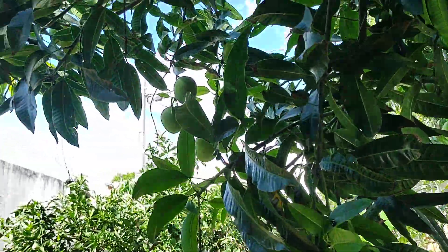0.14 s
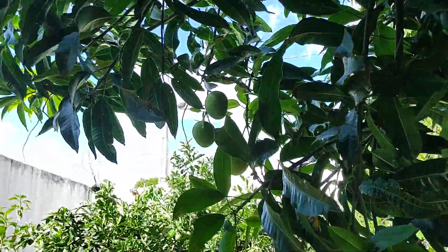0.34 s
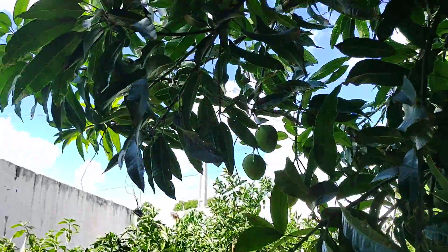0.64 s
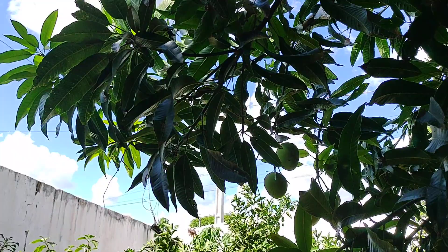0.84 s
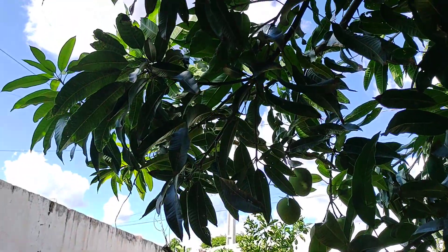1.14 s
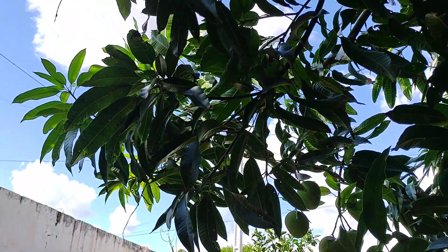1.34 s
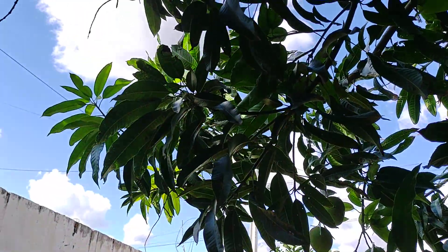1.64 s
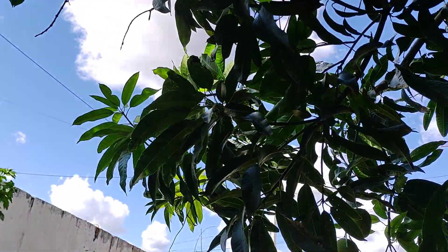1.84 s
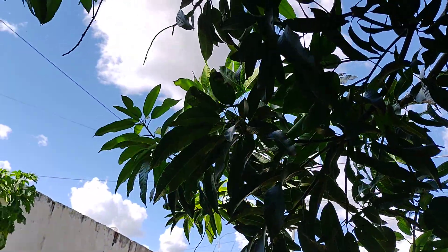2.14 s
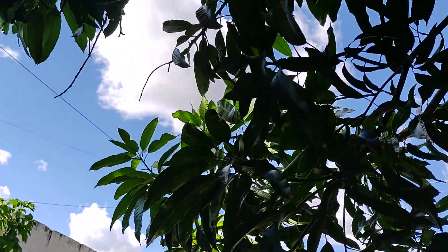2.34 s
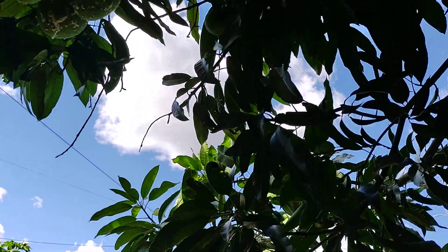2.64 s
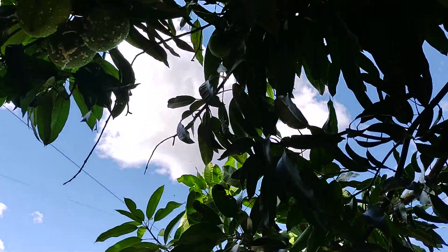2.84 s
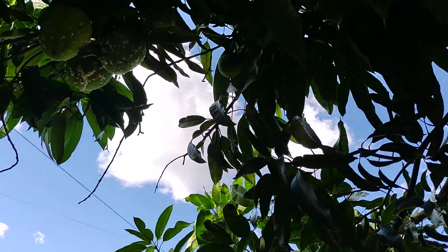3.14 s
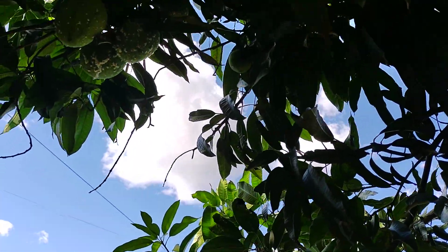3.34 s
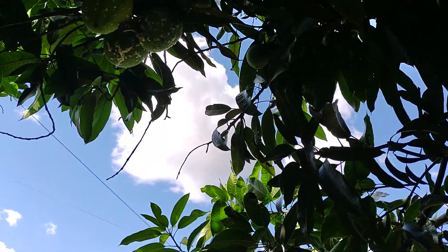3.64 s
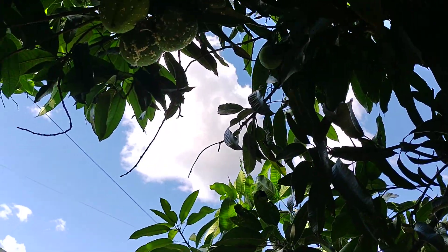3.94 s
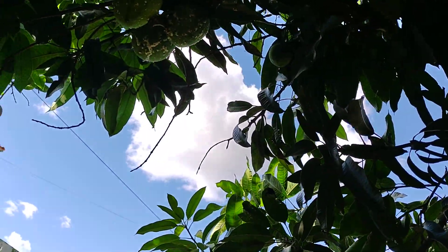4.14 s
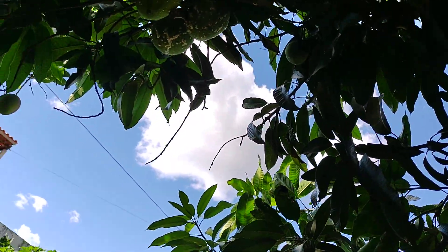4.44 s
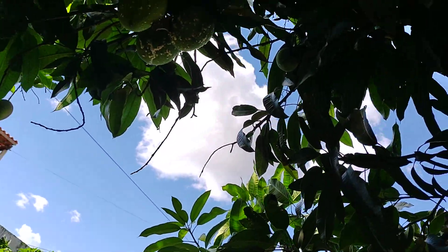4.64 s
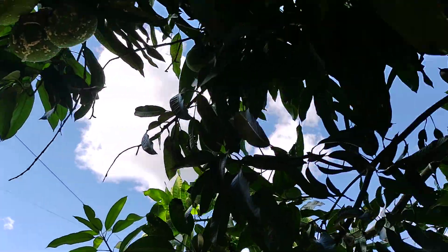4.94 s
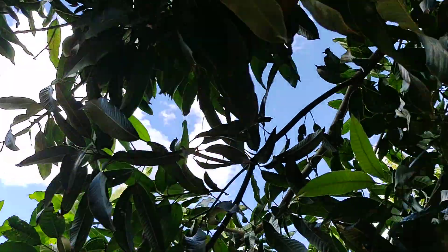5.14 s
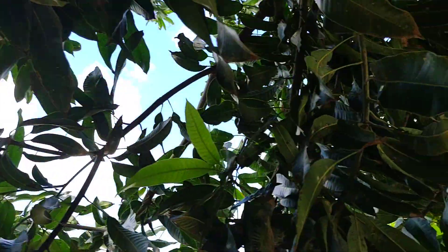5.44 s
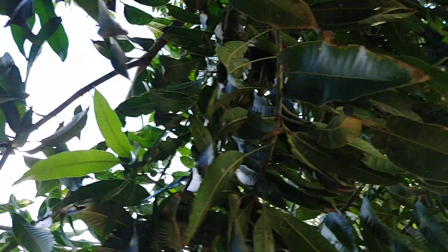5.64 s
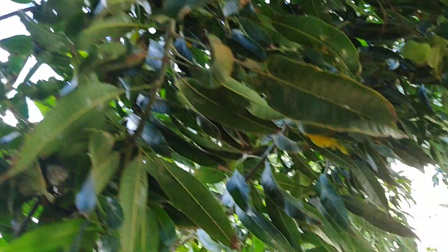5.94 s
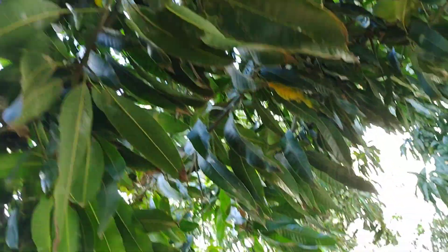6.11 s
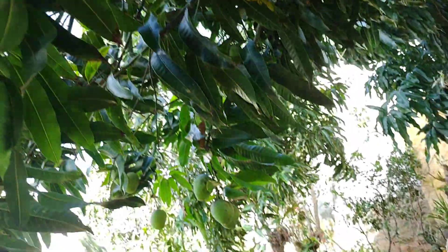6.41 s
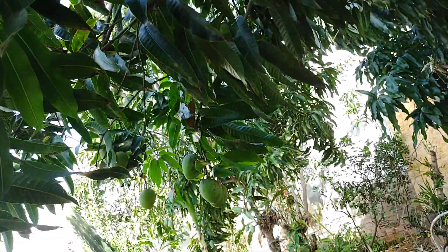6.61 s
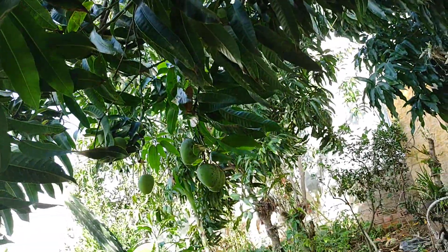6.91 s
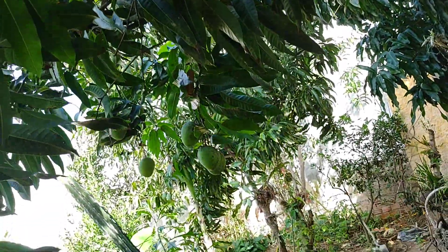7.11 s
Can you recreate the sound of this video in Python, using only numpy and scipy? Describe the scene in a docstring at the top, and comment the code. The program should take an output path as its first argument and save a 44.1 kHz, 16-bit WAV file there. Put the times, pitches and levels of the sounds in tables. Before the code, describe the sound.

Leaves hiss and flap in swelling, fading wind while a twig cracks close by and a distant bird pips over a low rumble.

```python
"""Gusts in a mango tree

Wind stirs stiff leaves in a walled garden, heard in mono from under the branches.
Each swinging branch brings a swell of tiny leaf contacts that hiss, rub and flap.
Some leaves slap together, branches bump, and one twig snaps close by.
Farther off, a small bird whistles and two faint hoots sound over a low outdoor rumble."""
import sys
import numpy as np
from scipy import signal
from scipy.fft import rfft, irfft, next_fast_len
from scipy.io import wavfile
from scipy.ndimage import uniform_filter1d, map_coordinates

SR = 44100
rng = np.random.default_rng(int(sys.argv[2]) if len(sys.argv) > 2 else 0)


def file_out(sig):
    """Save sig as 16-bit WAV at sys.argv[1]."""
    # one column per channel
    cols = np.atleast_2d(sig).T
    # limit, then scale
    lim = np.clip(cols, -1, 1)
    pcm = np.round(lim * 32767).astype(np.int16)
    wavfile.write(sys.argv[1], SR, pcm)


N = 320607
TIME = np.arange(N) / SR

# One branch swinging in the wind per row: peak_s, hiss_db, rise_s, fall_s, rub_db, flap_db
# Rise and fall are the time for a 10 dB change; rub and flap are relative to the hiss.
SWELLS = [(0.036, -44.5, 0.3, 0.108, 1, -15), (0.277, -34.5, 0.2, 0.26, -1, -5),
          (0.547, -33, 0.14, 0.0666, -3, -12.5), (0.616, -35, 0.03, 0.083, 1.5, -6),
          (0.921, -34.0, 0.02, 0.052, -1.5, -18), (1.169, -30.0, 0.21, 0.079, -2.5, -16),
          (1.463, -57, 0.1, 0.1, -13, -8), (1.89, -60.0, 0.1, 0.4, -11.5, -20),
          (2.231, -44.5, 0.186, 0.1, -0.5, -15), (2.415, -42.0, 0.126, 0.03, -10, -12.5),
          (2.517, -38.0, 0.073, 0.02, -1, -13), (2.609, -38.5, 0.03, 0.223, 0.5, -14.5),
          (2.743, -38.0, 0.0224, 0.097, 3, -11), (2.845, -32.0, 0.037, 0.11, 1, -12.5),
          (3.061, -35.0, 0.0674, 0.069, 2, -16), (3.228, -41.0, 0.13, 0.08, 0, -12),
          (3.48, -42.5, 0.06, 0.06, -4, -17), (3.655, -36.5, 0.09, 0.37, 2, -9),
          (3.86, -31.0, 0.139, 0.1848, -4, -10.5), (4.21, -29, 0.0427, 0.07, -7.5, -17),
          (4.423, -34.0, 0.31, 0.174, -1.5, -11), (4.576, -37.5, 0.146, 0.18, -3, -6),
          (4.841, -27.5, 0.087, 0.097, -3, -6.5), (5.121, -38.5, 0.17, 0.121, -3, -9),
          (5.28, -41.0, 0.33, 0.16, 0, -28), (5.513, -48.0, 0.1, 0.11, -2.5, -29),
          (5.82, -41.0, 0.1, 0.186, -13, -28), (6.069, -42.5, 0.06, 0.38, -0.5, -28),
          (6.418, -27.0, 0.0865, 0.09, 0.5, -10.5), (6.6, -45.0, 0.1, 0.114, 0, -4.5),
          (6.792, -38, 0.31, 0.11, -5.5, -18), (7.074, -42.5, 0.02, 0.2, -4, -13),
          (7.191, -42.5, 0.056, 0.05, -2.5, -23)]
# Leaves and stalks slapping together: start_s, level_db, stalk_pitch_hz, relative_scrape_db
SLAPS = [(0.036, -21, 960, -11.5), (0.49, -12.5, 4230, -8.5), (0.503, -7, 3260, -10.5),
         (0.555, -9.5, 3730, -22), (0.601, -9.5, 3710, -7), (0.719, -19.5, 4320, -13),
         (0.812, -17, 3700, -10.5), (1.915, -38, 3500, 0.5), (2.117, -29, 3890, -7.5),
         (2.482, -24, 3320, -15), (2.837, -10.5, 4250, -16), (3.122, -19, 1170, -13),
         (3.137, -15.5, 1300, -17), (3.369, -24, 3080, -12), (4.182, -12.5, 4440, -15.5),
         (4.358, -15, 2950, -21), (4.799, -17, 1440, -12), (5.233, -14, 4900, -17),
         (5.284, -28.5, 3660, 3.5), (5.38, -28, 1610, 1), (6.404, -9, 4260, -12), (6.706, -24.5, 2650, -1),
         (6.729, -9, 3800, -12), (6.754, -20.5, 2390, -7), (6.804, -15, 3640, -9.5)]
# The tones of the breaking twig: pitch_hz, level_db, fade_s (time to drop 60 dB)
TWIG_TONES = [(1000, -24, 0.0054), (1720, -18.5, 0.016), (2530, -17.5, 0.019), (4370, -14, .012),
              (6420, -5, 0.015), (6950, 0.5, 0.0054)]
# Branches swinging against each other: peak_s, level_db, length_s
BUMPS = [(0.47, -48, 0.19), (1.964, -42, 0.0039), (3.8, -47, 0.17), (4.795, -33.5, 0.018),
         (6.412, -40, 0.037)]
# The bird's clear, repeated pip: start_s, pitch_hz, level_db
PIPS = [(.723, 4300, -42.5), (1.253, 4220, -38), (2.305, 4330, -41.5), (3.451, 4290, -39),
        (4.068, 4250, -37.5), (4.654, 4250, -40), (5.18, 4280, -39), (5.8, 4305, -39.5),
        (7.048, 4315, -37.5)]
# Its rising chirps: start_s, length_s, start_pitch_hz, level_db, rasp (0 is pure, 1 is rough)
CHIRPS = [(1.342, 0.077, 4180, -50, .6), (1.395, .067, 4900, -51, .7), (1.694, 0.059, 4060, -41, .22),
          (1.702, .11, 4850, -47.5, .35), (1.91, .03, 5260, -47, .3), (1.756, .15, 4000, -46.5, .65),
          (5.635, .06, 4700, -46, 0.04), (5.688, .085, 5060, -36.5, .27), (6.172, .05, 4650, -40.5, .2),
          (6.25, .072, 5080, -35.5, .18), (6.28, .08, 2620, -44, 0.45), (6.84, .088, 5020, -40, .45),
          (7.246, .04, 4700, -37, .1)]
# Faint, distant hoots: peak_s, length_s, pitch_hz, level_db
HOOTS = [(2.385, .04, 802, -54), (2.495, .05, 784, -50)]
# How the background rises and falls: time_s, level_db
RUMBLE_LEVELS = [(0, -55), (1.45, -56.5), (2.1, -62), (2.55, -57.5), (3.3, -54), (4.05, -60), (4.5, -65),
                 (4.95, -64.5), (5.4, -59.5), (6.45, -55), (7.27, -55.5)]
BUFFET_LEVELS = [(0, -50), (.3, -51.5), (.55, -59.5), (.78, -53), (1.8, -58), (2.8, -57), (3.85, -47),
                 (4.1, -51.5), (4.4, -61), (6.1, -58), (6.45, -49.5), (6.62, -53), (7.27, -49.5)]

# The colour of each noise, or how strong it is from bass to treble: frequency_hz, level_db
HISS_COLOUR = [(800, -43.5), (2000, -16.5), (3200, -2.5), (4300, 0.5), (6000, -0.5), (7300, -0.5),
               (8500, -9)]  # leaf edges
RUB_COLOUR = [(600, -37.5), (1100, -11.5), (1700, -3), (2500, 1.5), (3200, -1.5), (4400, -3.5),
              (7500, -27.5)]  # leaves rubbing
BLADE_COLOUR = [(350, -32), (640, -12), (800, -4.5), (1250, -3.5), (1700, -5), (2600, -13), (5000, -49)]  # the broad, flat part of a leaf
FLAP_COLOUR = [(100, -34.5), (220, -6), (340, 0), (600, 3.5), (820, -1), (1100, -10.5), (2000, -21.5),
               (5000, -43.5)]  # leaves flapping
CRACK_COLOUR = [(150, -22), (600, -24.5), (1500, -1), (3800, 0.5), (6500, 1.5), (8000, -5)]  # slaps and splinters
BUMP_COLOUR = [(70, -20), (180, -10.5), (300, -2), (470, -1), (700, -1), (1500, -26), (4000, -55)]  # branches meeting
RUMBLE_COLOUR = [(12, -31.5), (26, -13.5), (35, 0), (46, -12), (70, -18), (200, -47.5)]  # deep outdoor rumble
BUFFET_COLOUR = [(35, -18), (60, -6.5), (83, 2.5), (120, -3), (165, -9), (220, -19), (500, -36.5),
                 (1500, -67.5)]  # low buffeting of the air
WASH_COLOUR = [(60, -13.5), (160, -3), (290, -2), (600, -8), (950, -10), (1500, -32), (3000, -17.5),
               (8000, -24.5)]  # the neighbourhood

# The garden's echo: frequency_hz, fade_s (time to drop 60 dB)
GARDEN_ECHO = [(200, .25), (2000, 0.39), (5000, 0.46), (8000, 0.26)]
# How the microphone dulls the top treble: frequency_hz, gain_db
MICROPHONE = [(7400, -1), (7750, -2.5), (8050, -13), (8350, -18.5), (8600, -40)]


def foliage():
    """Stronger wind brings more leaf contacts; twigs shake them into quick clumps."""
    hiss_db, rub_db, flap_db = swells()
    rate = 1500 * amp(.6 * (hiss_db - hiss_db.mean()))  # contacts a second
    shake = wobble(70)
    hiss = contacts(HISS_COLOUR, rate, spread_db=4.5, blur_db=4, leaf_db=1.3, echo_db=1.25)
    hiss *= amp(hiss_db + 6 + .6 * shake)
    rub = contacts(RUB_COLOUR, rate, spread_db=3.5, blur_db=-.5, leaf_db=1.5, echo_db=2)
    rub *= amp(rub_db + .5 + .77 * shake)
    # the broad blades sound only when leaves both rub and flap
    blade = contacts(BLADE_COLOUR, rate, spread_db=4.5, blur_db=1, leaf_db=.5, echo_db=2.5)
    blade *= amp(.51 * flap_db + .49 * rub_db + .5 + 1.52 * shake)
    flutter = amp(flap_db - 2 + 1.8 * wobble(35))
    flap = flutter * contacts(FLAP_COLOUR, rate, spread_db=3, blur_db=-2.5, leaf_db=1, echo_db=3.5)
    return hiss + rub + blade + flap


def swells():
    """Each branch swing builds and dies away; together they set the hiss, rub and flap levels in dB."""
    calm_db = -72.5  # the leaves never stand quite still
    turn_s = .005  # rounds off each peak
    power = np.full((3, N), amp(calm_db) ** 2)
    for peak_s, level_db, rise_s, fall_s, rub_db, flap_db in SWELLS:
        near = slice(max(int((peak_s - 5 * rise_s) * SR), 0), int((peak_s + 5 * fall_s) * SR))
        lag_s = TIME[near] - peak_s
        drop_db = 10 * (np.hypot(lag_s, turn_s) - turn_s) / np.where(lag_s < 0, rise_s, fall_s)
        shares = amp([0, rub_db, flap_db])
        power[:, near] += np.outer(shares, amp(level_db - drop_db)) ** 2
    hiss_db, rub_db, flap_db = 10 * np.log10(power)
    part_below_db = -44  # in weaker wind the leaves part, so rub and flap fade faster
    parted_db = .23 * np.minimum(hiss_db - part_below_db, 0)
    return hiss_db, rub_db + parted_db, flap_db + parted_db


def contacts(colour, rate, spread_db, blur_db, leaf_db, echo_db):
    """Leaves touch in tiny ticks of uneven strength, over the blur of distant ones."""
    strength = amp(spread_db * np.minimum(rng.exponential(size=N), 4))
    ticks = (rng.random(N) < rate / SR) * strength * rng.choice([-1, 1], N)
    rustle = normalise(ticks / np.sqrt(rate)) + amp(blur_db) * rng.standard_normal(N)
    rustle = patchy(rustle, leaf_db, size=128)  # each leaf has its own broad colour
    rustle = patchy(rustle, echo_db, size=1024)  # echoes between leaves add narrow peaks and dips
    return normalise(coloured(rustle, colour))


def slaps():
    """Two leaves meet with a sharp tick and a dead knock of the stalk, then scrape apart."""
    leaves, stalks = np.zeros((2, N))
    t = np.arange(SR // 4) / SR
    for start_s, level_db, stalk_hz, scrape_db in SLAPS:
        tick, scrape = rng.standard_normal((2, len(t)))
        tick *= fade(t, level_db - 4.5, fade_s=.011)
        scrape *= fade(t, level_db + scrape_db, fade_s=.093)
        add(leaves, start_s, tick + scrape)
        add(leaves, start_s, amp(level_db - 5.5) * np.ones(2))  # the first touch is a single push
        add(stalks, start_s, fade(t, level_db - 8.5, fade_s=.018) * sine(stalk_hz, t))
    return garden(coloured(leaves, CRACK_COLOUR) + stalks, echo_db=-9)


def twig_snap():
    """The twig breaks with a short ring; fibres splinter and nearby leaves scatter the crack."""
    snap_s, last_fibre_s = 1.9573, 1.9675
    wood, splinters = np.zeros((2, N))
    t = np.arange(SR // 4) / SR
    ring = sum(fade(t, db, fade_s) * sine(hz, t) for hz, db, fade_s in TWIG_TONES)
    attack = 1 - np.exp(-t / .00041)
    add(wood, snap_s, amp(.5) * attack * ring)
    add(wood, last_fibre_s, fade(t, -18, fade_s=.0055) * ring)
    burst = fade(t, -23.5, fade_s=.011) + fade(t, -15.5, fade_s=.14)
    add(splinters, snap_s, burst * rng.standard_normal(len(t)))
    return garden(wood + coloured(splinters, CRACK_COLOUR), echo_db=-14)


def branch_bumps():
    """Branches meet through a cushion of leaves: a soft, dull thud."""
    push = sum(amp(db) * hump(peak_s, length_s) for peak_s, db, length_s in BUMPS)
    return push * noise(BUMP_COLOUR)


def bird():
    """Thin gliding whistles, roughened by a fast uneven trill and blurred by the trees in between."""
    pip_s, pip_fall_hz, pip_rasp = .055, 60, .1
    chirp_rise_hz_per_s, trill_hz = 1500, 85
    pips = [(start_s, pip_s, hz, -pip_fall_hz, db, pip_rasp) for start_s, hz, db in PIPS]
    chirps = [(start_s, length_s, hz, chirp_rise_hz_per_s * length_s, db, rasp)
              for start_s, length_s, hz, db, rasp in CHIRPS]
    song = np.zeros(N)
    for start_s, length_s, start_hz, glide_hz, level_db, rasp in pips + chirps:
        progress = np.linspace(0, 1, int(length_s * SR))
        t = progress * length_s
        waver = map_coordinates(rng.standard_normal(128), [t * 700], mode="wrap")
        pitch_hz = start_hz + glide_hz * progress + rasp * (380 * sine(trill_hz, t) + 400 * waver)
        loudness = amp(level_db - .7) * np.sqrt(np.abs(np.sin(np.pi * progress)))
        add(song, start_s, loudness * np.sin(2 * np.pi * np.cumsum(pitch_hz) / SR))
    return garden(song, echo_db=-2.5)


def hoots():
    """Two soft, far-off hoots, each a pure tone that fades in and out."""
    tones = sum(amp(db) * hump(peak_s, length_s) * sine(hz, TIME) for peak_s, length_s, hz, db in HOOTS)
    return garden(tones, echo_db=-12)


def air():
    """Deep outdoor rumble, soft buffeting and the steady wash of the neighbourhood."""
    rumble = amp(over_time(RUMBLE_LEVELS) + 2.5) * noise(RUMBLE_COLOUR)
    buffet = amp(over_time(BUFFET_LEVELS) + .9) * noise(BUFFET_COLOUR)
    return rumble + buffet + amp(-65) * noise(WASH_COLOUR)


def garden(sound, echo_db):
    """Leaves and walls scatter a sound, adding a short echo."""
    hz, t, bands = signal.stft(rng.standard_normal(SR // 2), SR, nperseg=256)
    fade_s = over_frequency(GARDEN_ECHO, hz)[:, None]
    tail = signal.istft(bands * fade(t, 0, fade_s), SR, nperseg=256)[1]
    return sound + amp(echo_db) * signal.fftconvolve(sound, tail / np.linalg.norm(tail))[:N]


def patchy(sound, depth_db, size):
    """Let the colour drift in patches; a larger size makes them narrower and longer-lived."""
    bands = signal.stft(sound, nperseg=size)[2]
    patches = uniform_filter1d(rng.standard_normal(bands.shape), size=4, axis=0)  # smooth over frequency
    patches = uniform_filter1d(patches, size=8, axis=1)  # and over time
    return signal.istft(bands * amp(depth_db * normalise(patches)), nperseg=size)[1][:N]


def amp(db):
    """Turn decibels into a multiplier."""
    return 10 ** (np.asarray(db) / 20)


def normalise(sound):
    """Scale to an average power of 1."""
    return sound / np.sqrt(np.mean(sound ** 2) + 1e-20)


def sine(hz, t):
    """A pure tone."""
    return np.sin(2 * np.pi * hz * t)


def fade(t, start_db, fade_s):
    """A level that drops 60 dB every fade_s seconds."""
    return amp(start_db - 60 * t / fade_s)


def hump(peak_s, length_s):
    """A smooth rise to 1 and back."""
    return np.exp(-2 * ((TIME - peak_s) / length_s) ** 2)


def wobble(rate):
    """A smooth curve through `rate` random points a second."""
    return map_coordinates(rng.standard_normal(int(N * rate / SR) + 4), [TIME * rate])


def over_time(table):
    """Join a table's points into one value per sample."""
    return np.interp(TIME, *np.transpose(table))


def over_frequency(table, hz):
    """Read between a table's points, with octaves evenly spaced."""
    table_hz, values = np.transpose(table)
    return np.interp(np.log(hz + 1), np.log(table_hz + 1), values)


def filtered(sound, gain_at):
    """Turn each frequency up or down by gain_at(hz)."""
    size = next_fast_len(N + SR // 2)
    return irfft(rfft(sound, size) * gain_at(np.fft.rfftfreq(size, 1 / SR)), size)[..., :N]


def coloured(sound, colour):
    """Shape bass and treble with a colour table."""
    return filtered(sound, lambda hz: amp(over_frequency(colour, hz)))


def noise(colour):
    """Steady noise of one colour."""
    return normalise(coloured(rng.standard_normal(N), colour))


def add(track, start_s, sound):
    """Mix a sound into the track."""
    part = track[max(round(start_s * SR), 0):][:len(sound)]
    part += sound[:len(part)]


def scene():
    """The tree, the bird, the hoots and the air, alike in both channels."""
    mono = foliage() + slaps() + branch_bumps() + twig_snap() + bird() + hoots() + air()
    return np.array([mono, mono])


def record(dry):
    """The microphone dulls the top treble, and nothing above top_hz is kept."""
    top_hz = 8700
    return filtered(dry, lambda hz: amp(over_frequency(MICROPHONE, hz)) * (hz < top_hz))


dry = scene()
out = record(dry)
file_out(out)
```